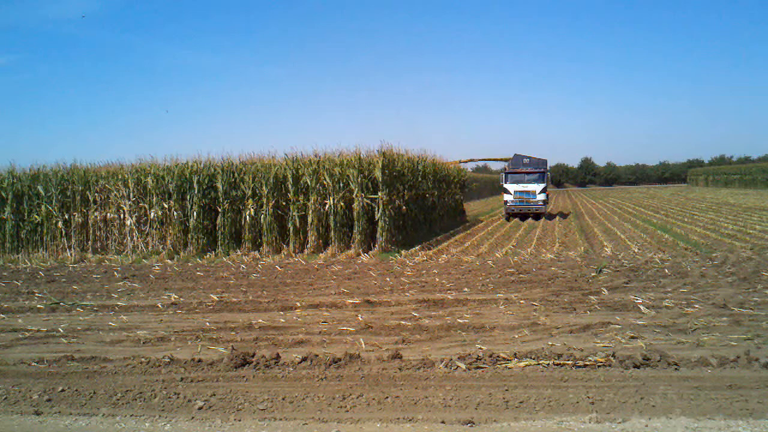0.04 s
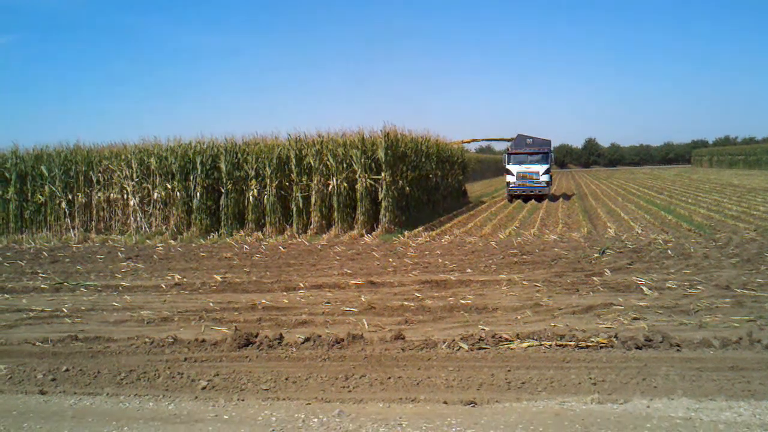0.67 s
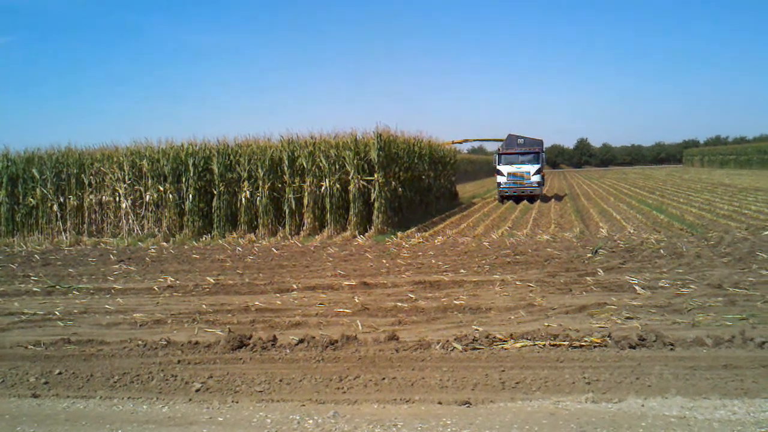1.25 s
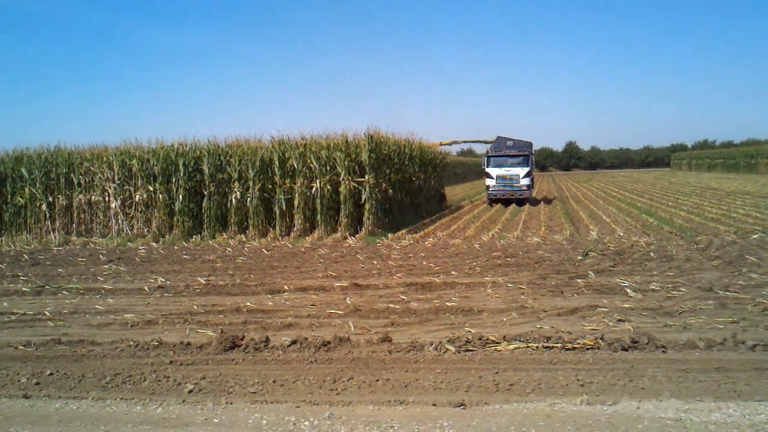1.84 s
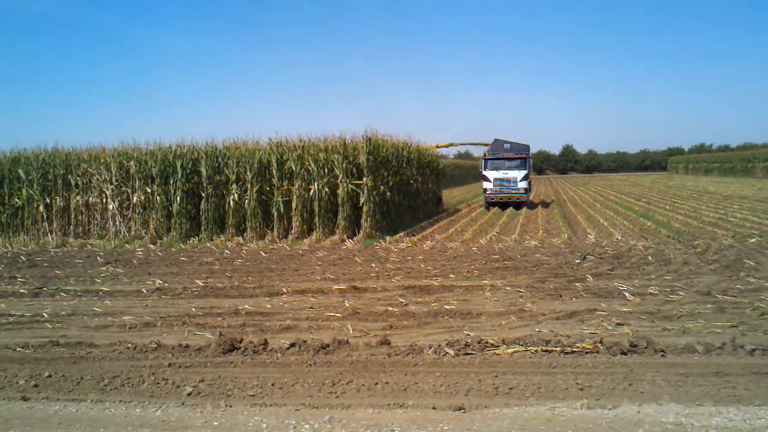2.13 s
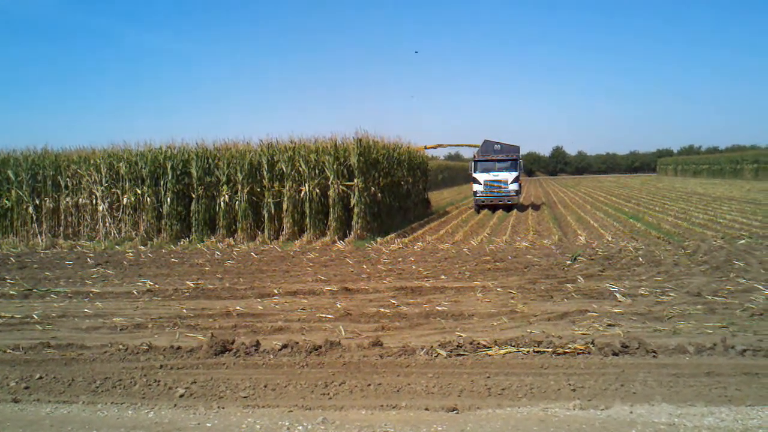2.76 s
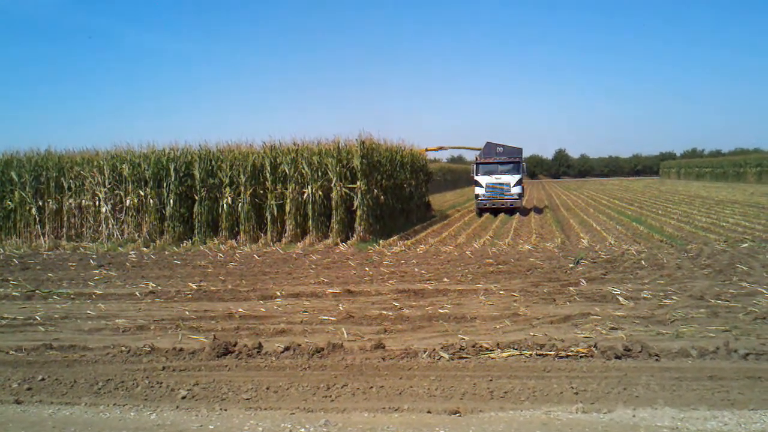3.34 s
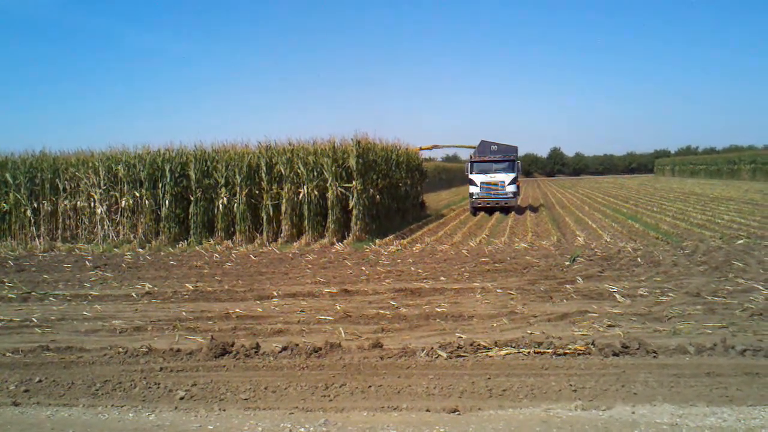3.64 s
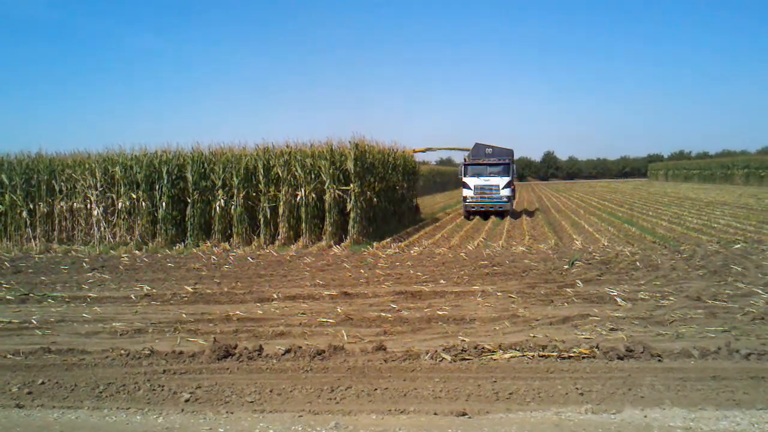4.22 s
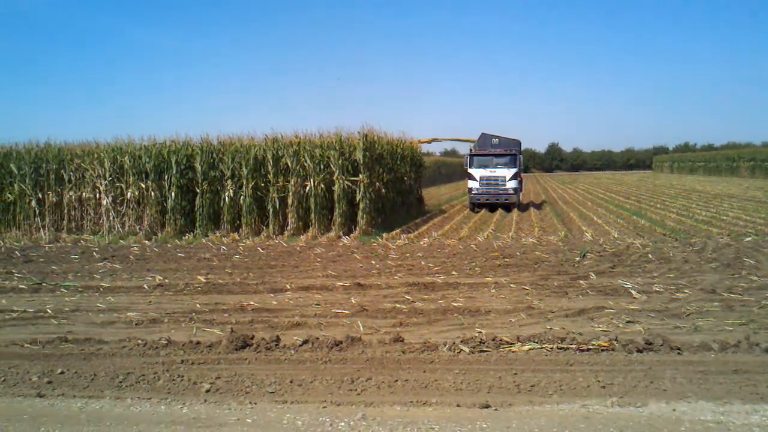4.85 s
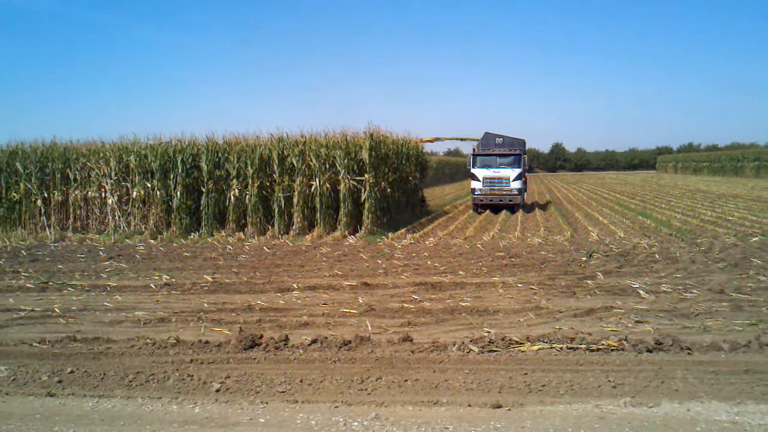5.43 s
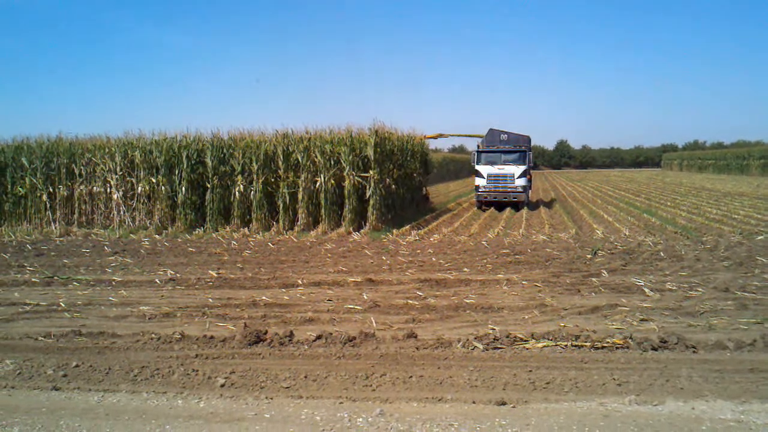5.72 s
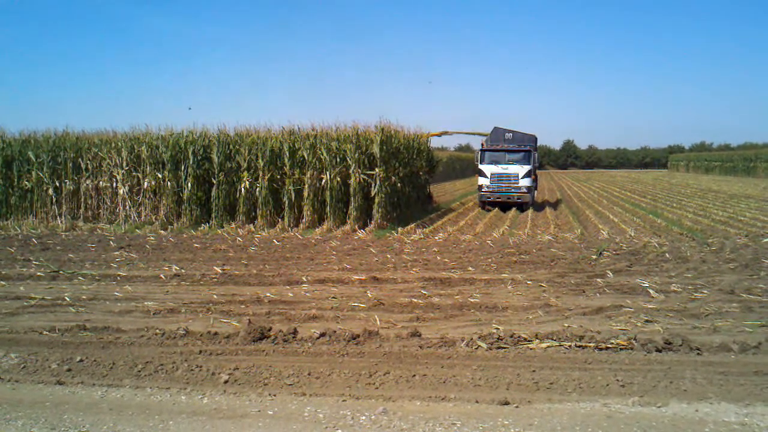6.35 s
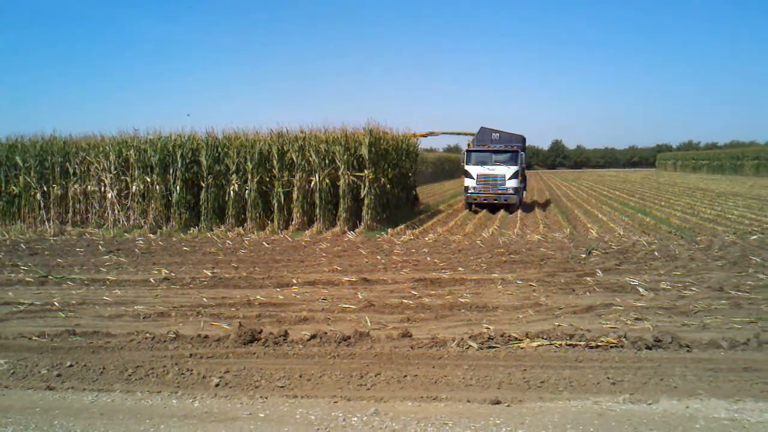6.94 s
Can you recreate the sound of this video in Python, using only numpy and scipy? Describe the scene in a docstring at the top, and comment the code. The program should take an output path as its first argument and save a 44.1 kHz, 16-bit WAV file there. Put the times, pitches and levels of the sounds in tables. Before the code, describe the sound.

After a brief silence, a loud corn harvester fades in between about 0.7 and 1 second, heard from the edge of the field. Its diesel engine drones at a nearly steady pitch inside a broad, gritty chopping roar, with a lighter hiss of blown crop. Underneath, its exhaust and that of a truck beside it make a fast, low throb. Short, high squeaks from the crop feed repeat unevenly, many times a second, throughout. Dry stalks crack briefly at about 0.9, 1.3, 2.3, 3.6 and 4.7 seconds, most clearly at 3.6, among a few faint leaf ticks. A high, rapidly warbling shaft whine starts faint and is stronger from about 4 seconds, and a thin whistle rises with it by 5 seconds. The machinery swells and dips slightly, growing a little louder overall, and is still running at the end, near 7 seconds.

```python
"""Forage harvester in corn

A harvester cuts corn and blows it into a truck that drives beside it. The orders of its six-cylinder
diesel drone over the broadband roar of chopper and blower, and the two exhausts beat against each other.
Friction makes the crop feed squeak several times a second and a shaft warble; a few dry stalks tick."""
import sys
import numpy as np
from scipy import signal
from scipy.fft import rfft, irfft
from scipy.io import wavfile

SR = 44100
rng = np.random.default_rng(int(sys.argv[2]) if len(sys.argv) > 2 else 0)


def file_out(sig):
    """Save sig as 16-bit WAV at sys.argv[1]."""
    # one column per channel
    cols = np.atleast_2d(sig).T
    # limit, then scale
    lim = np.clip(cols, -1, 1)
    pcm = np.round(lim * 32767).astype(np.int16)
    wavfile.write(sys.argv[1], SR, pcm)


N = 307818
T = np.arange(N) / SR
FADE_START_S, FADE_END_S = 0.71, 1.0

# whine of the rubbing shaft: t/s, resting f/Hz, sweep depth/Hz, level/dB
SHAFT_WHINE = [(1.0, 3540, 200, -50), (1.9, 3560, 300, -55), (2.4, 3680, 470, -50), (3.9, 3690, 500, -42),
               (5.1, 3735, 460, -41.5), (5.9, 3640, 230, -41.5), (6.98, 3540, 220, -42)]
# loudest squeaks of the crop feed: t/s, relative level/dB, f/Hz of the fourth partial
LOUD_SQUEAKS = [(0.831, -36, 7900), (1.0203, -38, 8140), (1.309, -39, 8000), (2.049, -38.5, 8130),
                (2.2194, -36, 8140), (2.6529, -34, 8020), (2.9734, -35.5, 7970), (3.1623, -34, 7810),
                (3.3509, -33.5, 8230), (3.4775, -32, 8270), (3.7361, -34, 8300), (3.928, -34.5, 8200),
                (4.3121, -31.5, 8270), (4.6483, -32.5, 8120), (4.8449, -33, 7900), (5.6636, -35, 8305),
                (5.8549, -33, 8250), (5.9464, -33, 8290), (6.0457, -32, 8290), (6.5206, -36, 8050),
                (6.8079, -34.5, 8240)]


def gain_of(db):
    """Amplitude ratio of a level in decibels."""
    return 10 ** (np.asarray(db) / 20)


def unit_rms(x):
    """Normalisation to an rms of one."""
    return x / np.sqrt(np.mean(abs(x) ** 2) + 1e-20)


def curves(rows):
    """Linear interpolation of each column over the times in the first."""
    times, *columns = np.transpose(rows)
    return [np.interp(T, times, column) for column in columns]


def add(mix, start_s, sound):
    """Superposition of a sound on the mix from a given time."""
    part = mix[max(round(start_s * SR), 0):][:len(sound)]
    part += sound[:len(part)]


def coloured(x, envelope):
    """Filtering by a spectral envelope (f/Hz, level/dB), to an rms of one."""
    hz, db = np.transpose(envelope)
    f = np.fft.rfftfreq(N, 1 / SR)
    response = gain_of(np.interp(np.log(f + 1), np.log(hz), db))
    return unit_rms(irfft(rfft(x) * response, N))


def drift(rate_hz, size=8192):
    """Random fluctuation: low-pass Gaussian noise of rms one."""
    f = np.fft.rfftfreq(size, N / SR / size)
    slow = irfft(rfft(rng.standard_normal(size)) * np.exp(-.5 * (f / rate_hz) ** 2))
    return unit_rms(np.interp(T, np.linspace(0, T[-1], size), slow))


def running_phase(hz):
    """Phase in radians as the integral of frequency, from a random start."""
    return 2 * np.pi * (np.cumsum(hz * np.ones(N)) / SR + rng.random())


def tone(hz, blur, blur_hz):
    """Line broadening: scattering by moving air and crop modulates a tone's amplitude and phase."""
    phase = running_phase(hz)
    in_phase = (1 + blur * drift(blur_hz)) * np.cos(phase)
    quadrature = blur * drift(blur_hz) * np.sin(phase)
    return unit_rms(in_phase + quadrature)


def band(hz, width_hz, count):
    """Resonance driven by white noise, at an rms of one."""
    f = np.fft.rfftfreq(count, 1 / SR)
    response = 1 / (1 + (2 * (f - hz) / width_hz) ** 2)
    return unit_rms(irfft(rfft(rng.standard_normal(count)) * response, count))


def swell_db(usual_db=-36):
    """Level above the usual: it grows as the harvester nears and swells with the crop intake."""
    # loudness of the harvester: t/s, level/dB
    loudness = [(1.0, -38), (1.1, -38.7), (1.3, -36.5), (1.78, -41), (2.0, -40), (2.38, -36), (2.79, -38.5),
                (3.1, -36), (3.48, -37.5), (3.66, -34.5), (4.15, -35.5), (5.03, -34), (5.09, -38),
                (5.23, -33), (5.78, -34.5), (5.97, -33), (6.62, -33), (6.98, -34.5)]
    return curves(loudness)[0] - usual_db


def part_gain(db, follow, wander_db):
    """Common modulation: a part follows the swell (dB per dB) and wanders a little on its own."""
    return gain_of(db + follow * swell_db() + wander_db * drift(rate_hz=1.85))


def whistle(level_db=-56, rise_db=10, rise_at_s=4.2, rise_s=.6):
    """Slight frequency modulation unsteadies a thin tone at the whine's resting pitch; it swells once."""
    hz = curves(SHAFT_WHINE)[0] + 12 * drift(6)
    risen = np.clip((T - rise_at_s) / rise_s, 0, 1)
    return gain_of(level_db + rise_db * risen) * tone(hz, blur=.25, blur_hz=25)


def snaps(count=2048):
    """Brittle fracture: dry leaves and thick stalks give exponentially damped bursts of noise."""
    # leaves ticking close by: t/s, relative level/dB, centre f/Hz
    ticks = [(1.3161, -44, 10500), (2.6726, -37, 10300), (3.4239, -46, 11140), (3.4637, -37, 10300),
             (4.044, -38, 9900), (4.2727, -42, 8970), (5.0279, -38, 9140), (6.386, -43, 9740)]
    # stalks cracking in the rollers: t/s, relative level/dB
    cracks = [(0.937, -28), (1.316, -30), (2.255, -31), (3.6462, -23), (4.673, -26)]
    out, t = np.zeros(N), np.arange(count) / SR
    for start_s, db, hz in ticks:
        add(out, start_s, gain_of(db - 1.5) * np.exp(-t / .003) * band(hz, 3200, count))
    for start_s, db in cracks:
        add(out, start_s, gain_of(db - 3) * np.exp(-t / .006) * band(3100, 1300, count))
    return out


def shaft_whine(cycles_per_turn=75):
    """Periodic friction: once a turn the pitch of a rubbing shaft jumps up and slides back."""
    resting_hz, depth_hz, level_db = curves(SHAFT_WHINE)
    turn = running_phase(resting_hz / cycles_per_turn) / (2 * np.pi) % 1
    hz = resting_hz + depth_hz * np.exp(-(turn / .22) ** 2)
    grip = 1 + .75 * np.cos(2 * np.pi * (turn - .18))
    return gain_of(level_db) * unit_rms(grip * tone(hz, blur=.15, blur_hz=100))


def lesser_squeaks(count=70, gap_s=.105, jitter_s=.014):
    """A jittered pulse train fills the gaps between the loud squeaks, in rows of the same form."""
    late, louder, higher = rng.standard_normal((count, 3)).T
    times = FADE_START_S + gap_s * np.arange(count) + jitter_s * late
    db = -39.5 + 0.62 * np.interp(times, T, swell_db()) + 2 * louder
    fourth_hz = 8080 + 121 * higher
    to_loud_s = abs(times[:, None] - np.transpose(LOUD_SQUEAKS)[0]).min(1)
    return list(np.transpose([times, db, fourth_hz])[to_loud_s > gap_s / 2])


def feed_squeaks(rise_s=.0023, decay_s=.017, lead_s=.004, trim_db=-7, count=4096):
    """Stick-slip friction of stalks on steel: short harmonic tones on a shaky pitch, with some scrape."""
    # partials of a squeak: harmonic number, relative level/dB
    partials = [(1, -3.5), (2, 0), (3, -8), (4, -9), (5, -20.5)]
    out, t = np.zeros(N), np.arange(count) / SR
    envelope = (1 - np.exp(-(t / rise_s) ** 2)) * np.exp(-t / decay_s)
    envelope /= envelope.max()
    for time_s, db, fourth_hz in LOUD_SQUEAKS + lesser_squeaks():
        pitch_hz = fourth_hz / 4 * (1 + .005 * band(0, 300, count))
        cycles = np.cumsum(pitch_hz) / SR
        stack = sum(gain_of(partial_db) * np.cos(2 * np.pi * (k * cycles + rng.random()))
                    for k, partial_db in partials)
        stack *= np.sqrt(2) * (1 + 0.74 * band(0, 320, count))  # roughness
        scrape = gain_of(-3.5) * band(6000, 5000, count)
        add(out, time_s - lead_s, gain_of(db + trim_db) * envelope * (stack + scrape))
    return out


def chopper(crank_hz):
    """Amplitude-modulated noise: a roar pulsing at the firing rate, gritty chopping and blown crop."""
    # spectral envelopes of roar, chopping and the hiss of blown crop: f/Hz, relative density level/dB
    roar_spectrum = [(20, -34), (42, -29), (62, -19.5), (85, -6.5), (115, -0.5), (160, 6.5), (225, 3),
                     (270, 1), (330, 2), (450, 4), (590, 6.5), (700, 5.5), (950, -1), (1300, -35)]
    chop_spectrum = [(600, -27.5), (985, 3.5), (1130, -1), (1450, 1.5), (1750, -0.5), (1880, -2),
                     (2050, -2.5), (2170, -10.5), (2500, -4), (3100, -3), (3600, -2.5), (4100, -4.5),
                     (4500, -23), (6000, -34.5)]
    hiss_spectrum = [(2500, -33), (4400, 8.5), (5600, 3), (6150, 7), (7300, 0.5), (8000, 6.5), (8700, -1),
                     (9900, 1), (10700, -20), (11700, -39), (12500, -9), (16000, -19)]
    # resonances of the chopper housing: f/Hz, width/Hz, relative level/dB
    housing_modes = [(1977, 37, -12), (2083, 68, -16.5), (1284, 22, -24.5)]
    firing = np.cos(running_phase(6 * crank_hz))
    roar = coloured(rng.standard_normal(N) * (1 + 0.31 * firing), roar_spectrum)
    grit = gain_of(0.89 * drift(94) + 1.55 * drift(13.5)) * (1 + 0.042 * firing)
    chop = coloured(rng.standard_normal(N) * grit, chop_spectrum)
    chop += sum(gain_of(db) * band(hz, width_hz, N) for hz, width_hz, db in housing_modes)
    hiss = coloured(rng.standard_normal(N) * grit * gain_of(0.36 * drift(400)), hiss_spectrum)
    return (part_gain(-35, follow=0.79, wander_db=0.32) * roar
            + part_gain(-36, follow=1, wander_db=0.5) * chop
            + part_gain(-49.5, follow=0.96, wander_db=0.45) * hiss)


def exhausts(crank_hz):
    """Beats: below the firing note, the harvester's fourth order and the truck interfere at about 9 Hz."""
    # spectral lines of the truck's exhaust: f/Hz, relative level/dB
    truck_lines = [(49, -52), (98, -18), (131.3, -3.5), (181, -11.5), (195, -17)]
    truck = sum(gain_of(db) * tone(hz, blur=0.31, blur_hz=6.3) for hz, db in truck_lines)
    beat_gain = part_gain(-41, follow=0.97, wander_db=0.87)
    fourth_order = gain_of(-3.5) * tone(4 * crank_hz, blur=0.27, blur_hz=2.6)
    firing_gain = part_gain(-40, follow=0.81, wander_db=1.57)
    firing_note = tone(6 * crank_hz, blur=0.7, blur_hz=14.4)
    return beat_gain * (truck + fourth_order) + firing_gain * firing_note


def diesel(crank_hz):
    """Engine orders: the low ones hold firm, the high ones are scattered more on their way over the crop."""
    # low and high engine orders: multiple of the crank rate, relative level/dB
    low_orders = [(11.25, -10.5), (12, 1), (12.5, -9.5), (13.5, -18)]
    high_orders = [(15, -22), (16, -8.5), (16.8, -5.5), (18, 0.5), (18.5, -9.5), (21.4, -27), (23.6, -12.5),
                   (24, -4.5), (24.4, -12.5), (28.25, -16.5), (36.3, -14.5), (48.5, -13)]
    low = sum(gain_of(db) * tone(k * crank_hz, blur=.25, blur_hz=9) for k, db in low_orders)
    high = sum(gain_of(db) * tone(k * crank_hz, blur=.46, blur_hz=14.2) for k, db in high_orders)
    return (part_gain(-39, follow=0.68, wander_db=1.6) * low
            + part_gain(-40, follow=1.2, wander_db=0.64) * high)


def scene():
    """Superposition of both machines and the crop, heard from the edge of the field."""
    # firing rate of the harvester's engine: t/s, f/Hz
    firing_rate = [(1.1, 212.6), (1.75, 207), (2.05, 211.5), (2.98, 206.4), (4.11, 211.8), (4.36, 208.3),
                   (5.16, 210.9), (5.59, 214.1), (6.14, 205.4), (6.26, 210.7), (6.98, 212.5)]
    crank_hz = curves(firing_rate)[0] / 6
    machines = diesel(crank_hz) + exhausts(crank_hz) + shaft_whine() + whistle()
    crop = chopper(crank_hz) + snaps() + feed_squeaks()
    return (machines + crop)[None]


def record(dry, cutoff_hz=15800):
    """Band limiting by a low-pass filter, after a short fade-in."""
    fade = np.clip((T - FADE_START_S) / (FADE_END_S - FADE_START_S), 0, 1) ** 1.03
    low_pass = signal.firwin(1023, cutoff_hz, window=("kaiser", 9), fs=SR)
    return signal.oaconvolve(dry * fade, low_pass[None], "same")


dry = scene()
out = record(dry)
file_out(out)
```